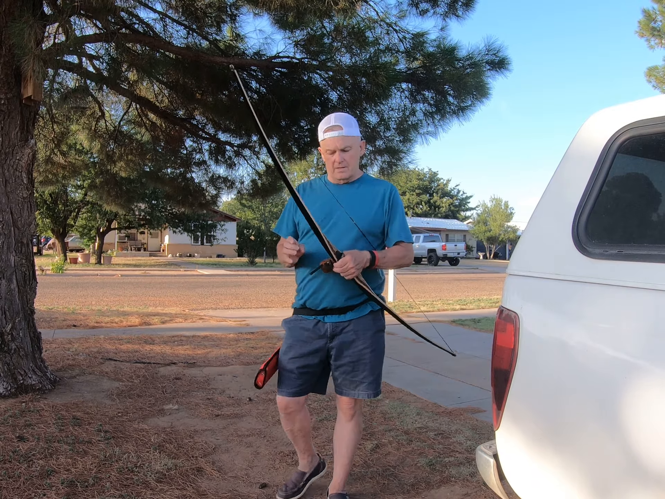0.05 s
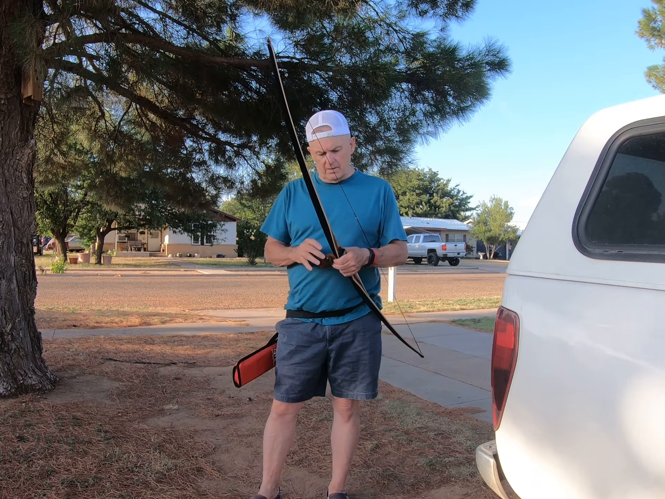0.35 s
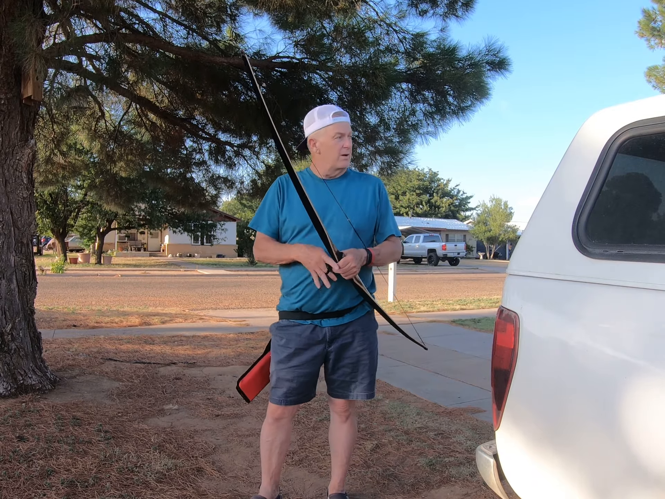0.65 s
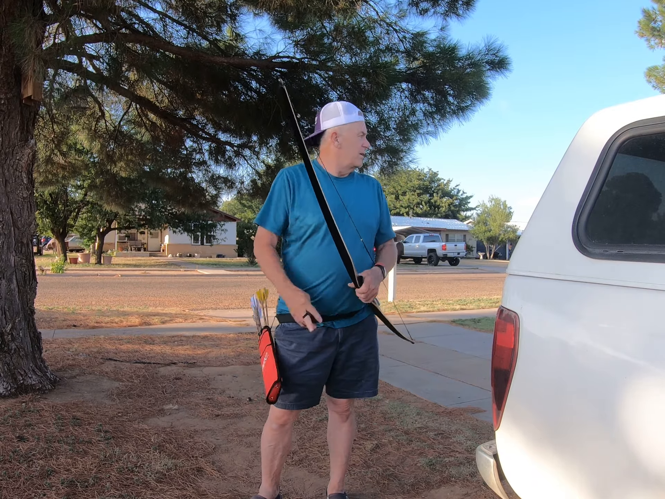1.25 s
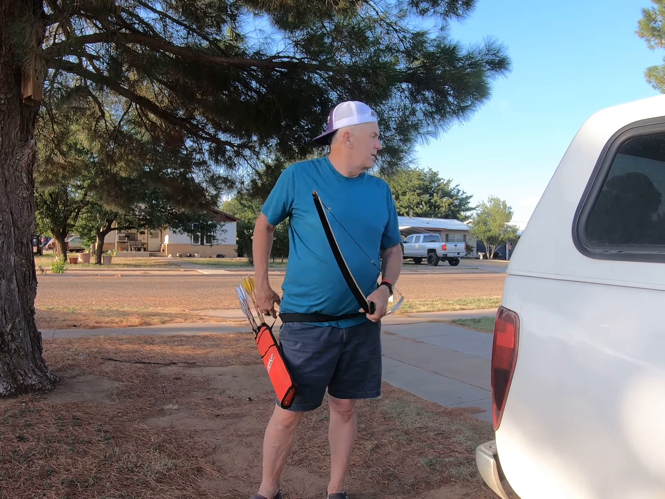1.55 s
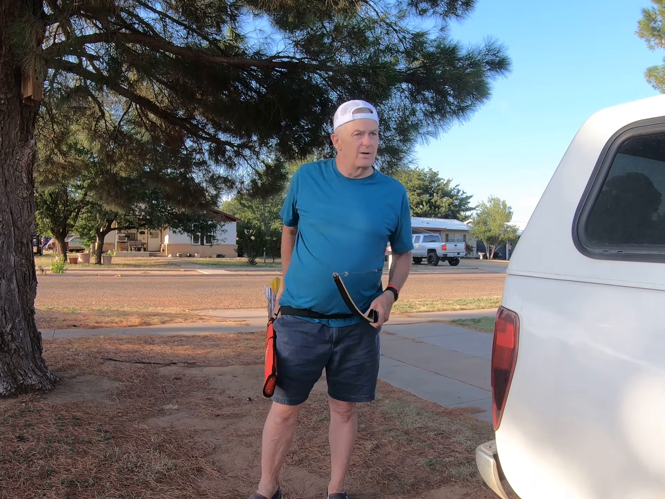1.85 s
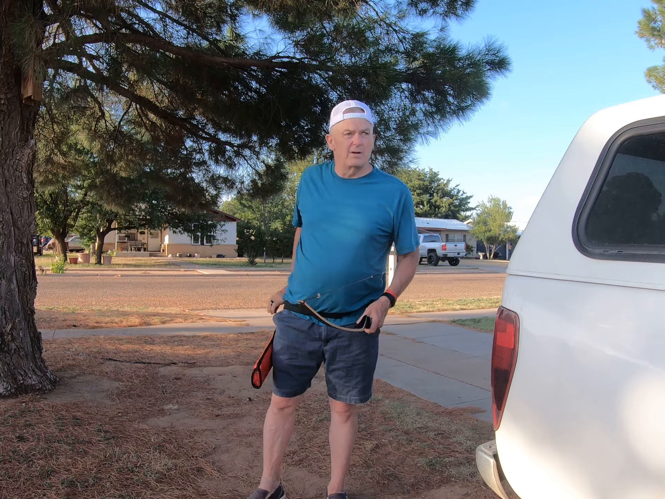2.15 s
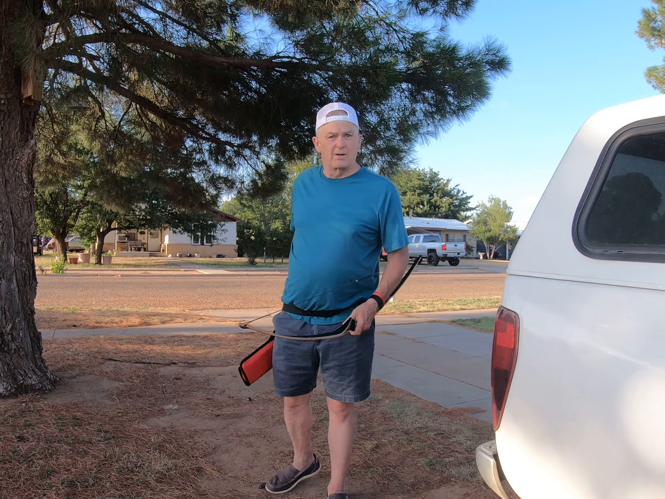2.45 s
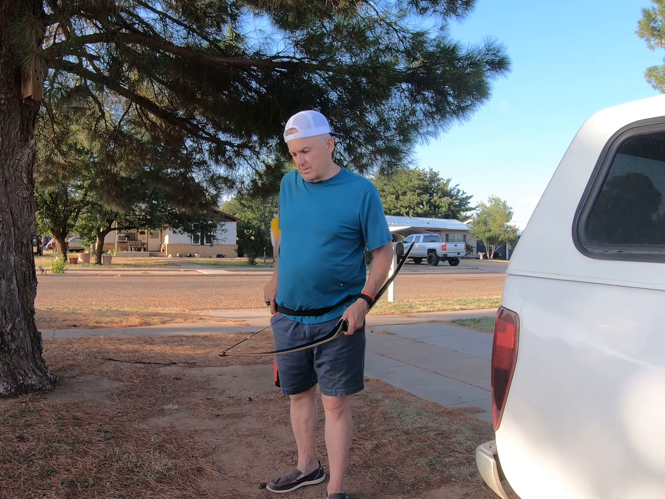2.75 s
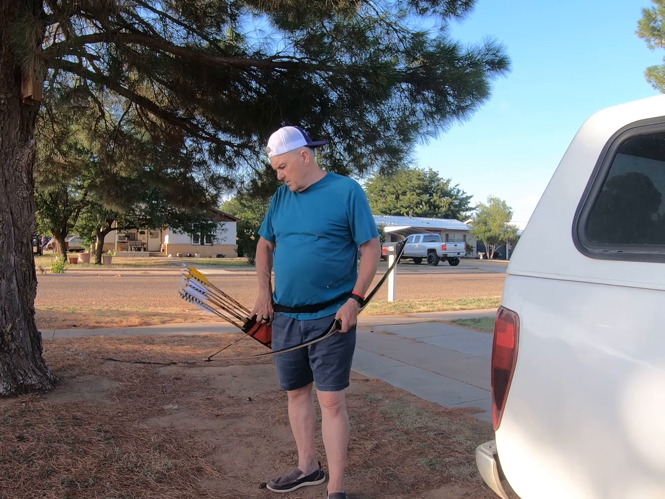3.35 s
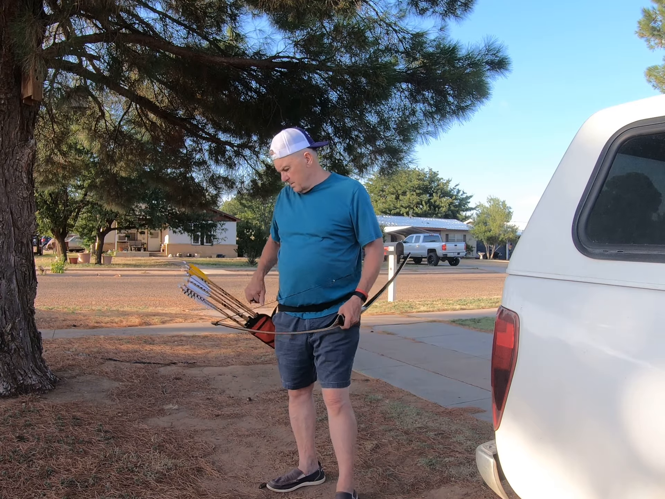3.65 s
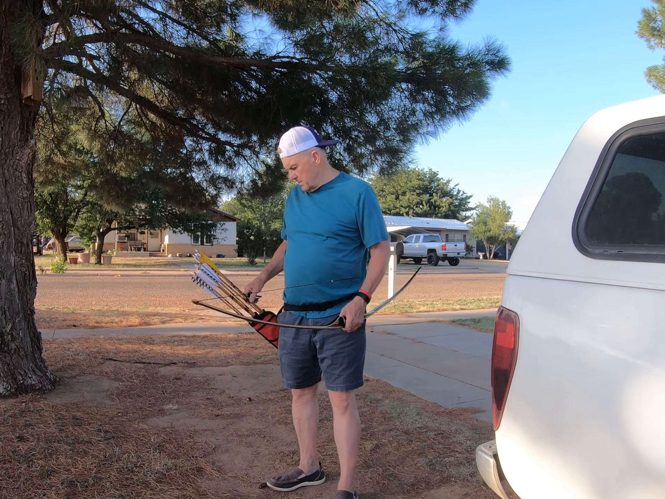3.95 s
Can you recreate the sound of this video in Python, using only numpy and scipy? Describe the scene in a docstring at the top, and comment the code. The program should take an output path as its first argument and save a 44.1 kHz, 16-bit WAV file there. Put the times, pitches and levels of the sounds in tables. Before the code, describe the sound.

Arrow shafts knock and slide inside a quiver outdoors. They go quiet for about a second, then chatter more densely with a few soft thuds against the quiver wall, while wind buffets the microphone, most strongly near the end.

```python
"""Arrows shifting in a hip quiver.

Shafts knock, chatter and slide along the quiver wall, which thuds under the heaviest shoves.
Each shaft contact rings short modes and a dry crack, with faint scatter from ground and trees.
Gusts rumble on the microphone over a distant outdoor hush."""
import sys
import numpy as np
from scipy import signal
from scipy.fft import rfft, irfft
from scipy.io import wavfile
from scipy.ndimage import uniform_filter1d

SR = 44100
rng = np.random.default_rng(int(sys.argv[2]) if len(sys.argv) > 2 else 0)


def master(y):
    """Save y as 16-bit WAV."""
    cut = np.clip(np.atleast_2d(y).T, -1, 1)
    pcm = np.round(cut * 32767)  # scale
    wavfile.write(sys.argv[1], SR, pcm.astype(np.int16))


N = 176400


def undb(db):
    """Decibels to gain."""
    return 10 ** (np.asarray(db) / 20)


def unit(x):
    """Scale to rms 1."""
    return x / np.sqrt(np.mean(x ** 2) + 1e-24)


def add(out, start_s, x):
    """Mix x into out at start_s."""
    i = max(int(start_s * SR), 0)
    out[i:i + len(x)] += x[:N - i]


def band(x, lo_hz, hi_hz, order):
    """Causal band-pass."""
    return signal.sosfilt(signal.butter(order, [lo_hz, hi_hz], "band", fs=SR, output="sos"), x)


def fade(t, t60_s):
    """Exponential decay."""
    return np.exp(-np.log(1000) * t / t60_s)


def coloured(spectrum):
    """Unit-rms noise shaped by (freq_hz, density_db) points, rolled off below the first."""
    hz, db = np.array(spectrum).T
    bins_hz = np.maximum(np.fft.rfftfreq(N, 1 / SR), 1e-3)
    gain = undb(np.interp(np.log(bins_hz), np.log(hz), db)) * np.minimum(bins_hz / hz[0], 1) ** 2
    return unit(irfft(rfft(rng.standard_normal(N)) * gain, N))


def narrow(pitch_hz, width_hz):
    """Wavering tone: noise in one resonance."""
    return unit(band(rng.standard_normal(N), pitch_hz - width_hz / 2, pitch_hz + width_hz / 2, order=2))


def drift(rate_hz):
    """Slow random drift, spread near 1."""
    hold = int(SR / rate_hz)
    steps = np.repeat(rng.standard_normal(N // hold + 1), hold)
    return 1.3 * uniform_filter1d(uniform_filter1d(steps, hold), hold)[:N]


def steady(x, window_s=0.11):
    """Hold the running rms near 1."""
    return x / np.sqrt(uniform_filter1d(x ** 2, int(window_s * SR)) + 1e-6)


def distance():
    """Outdoor hush, a low drone and a thin far whine that fades early."""
    # freq_hz, density_db
    hush_spectrum = [(41, -28), (70, 4), (98, 0), (173, -6), (207, -4.5), (227, -13), (304, -9.5),
                     (381, -14.5), (457, -15), (670, -17.5), (1290, -22), (1410, -21.5), (1550, -23.5),
                     (3490, -32), (15500, -40)]
    # pitch_hz, width_hz, level_db
    drone_tones = [(121.8, 28.6, -66), (175, 27, -64.5), (238.6, 22.8, -69), (277.2, 18.3, -72)]
    whine_end_s, whine_fade_s = 1, 0.49
    t = np.arange(N) / SR
    drone = sum(undb(db) * narrow(hz, width_hz) for hz, width_hz, db in drone_tones)
    whine = undb(-73.5) * narrow(pitch_hz=1373, width_hz=57)
    whine *= np.clip((whine_end_s - t) / whine_fade_s, 0, 1)
    hush = undb(-56.5 + 0.17 * drift(rate_hz=5)) * coloured(hush_spectrum)
    return hush + drone + whine


def wind():
    """Buffeting on the microphone follows the gusts; slow pressure swings follow them less."""
    # time_s, strength_db
    gusts = [(0.03, -36), (0.08, -34), (0.25, -45.5), (0.37, -56), (0.48, -43), (0.79, -48), (0.95, -26.5),
             (1.18, -44.5), (1.23, -67), (1.37, -48.5), (1.61, -51.5), (1.67, -53), (1.74, -57),
             (2.07, -48.5), (2.14, -35), (2.2, -56.5), (3.11, -58.5), (3.18, -40), (3.3, -41.5),
             (3.36, -26), (3.45, -17), (3.54, -39), (3.57, -39), (3.67, -25.5), (3.85, -46.5), (3.94, -24)]
    # freq_hz, density_db
    buffet_spectrum = [(21, -1), (28, 4.5), (39, -17), (55, -15), (70, -42), (110, -40), (300, -78),
                       (1000, -110)]
    # freq_hz, density_db
    sway_spectrum = [(3, 3.5), (9, 6), (16, -7.5), (22, -29), (30, -23.5), (60, -46), (300, -110)]
    gust_db = np.interp(np.arange(N) / SR, *np.array(gusts).T)
    gust_db = uniform_filter1d(gust_db, SR // 40)
    buffet = steady(coloured(buffet_spectrum)) * undb(gust_db + 5)
    sway = steady(coloured(sway_spectrum)) * undb(0.42 * gust_db - 7)
    return buffet + sway


def outdoor_scatter(x, level_db=-19, delay_s=0.008):
    """Add faint reflections from ground and trees."""
    t = np.arange(SR // 2) / SR
    tail = band(rng.standard_normal(len(t)), 300, 9000, order=1) * fade(t, t60_s=0.33) * (t > delay_s)
    return x + undb(level_db) * signal.fftconvolve(x, tail / np.linalg.norm(tail))[:N]


def wall_thuds(attack_s=0.0022):
    """The soft quiver wall thuds under the heaviest shoves."""
    # start_s, level_db, t60_s
    shoves = [(.292, -50, 0.17), (2.307, -67, 0.045), (2.868, -50, 0.077), (3.506, -54, 0.034)]
    out, t = np.zeros(N), np.arange(SR // 4) / SR
    for start_s, level_db, t60_s in shoves:
        wall = unit(band(rng.standard_normal(len(t)), 220, 470, order=2))
        add(out, start_s, undb(level_db) * wall * np.minimum(t / attack_s, 1) * fade(t, t60_s))
    return out


def contacts(size, rate_per_s, scatter_db=3.5):
    """Random tiny impacts of uneven force."""
    hits = rng.random(size) < rate_per_s / SR
    return hits * undb(scatter_db * rng.standard_normal(size)) * rng.choice([-1, 1], size)


def shafts(force, clack_hz, crack_db):
    """Contact forces excite shaft modes and a dry crack. Returns body, clack and tip tick bands."""
    # pitch_hz, relative_db
    modes = [(600, 0.5), (920, -2.5), (1270, -2.5), (1680, -2.5), (2080, -6), (2620, 2.5), (3130, 4),
             (3600, -0.5), (4210, 1.5), (4740, 4.5), (5240, 1.5), (5890, -5.5), (7350, 1), (10100, -11)]
    scatter_ratio, scatter_db, clack_width_ratio = 0.028, 4, 1.27
    body_lo_hz, clack_lo_hz, tick_lo_hz, tick_hi_hz = 700, 1877, 6110, 11700
    size, t = len(force), np.arange(SR // 8) / SR
    ring = 0
    for pitch_hz, relative_db in modes:
        detune, strength, polarity = rng.standard_normal(3)
        gain = np.sign(polarity) * undb(relative_db + scatter_db * strength)
        ring += gain * np.sin(2 * np.pi * pitch_hz * (1 + scatter_ratio * detune) * t)
    ringing = signal.fftconvolve(force, ring * fade(t, t60_s=0.027))[:size]
    crack_power = signal.fftconvolve(force ** 2, fade(t, t60_s=0.0051) ** 2)[:size]
    crack = rng.standard_normal(size) * np.sqrt(np.abs(crack_power))
    struck = unit(ringing) + undb(crack_db) * unit(crack)
    # The point of contact colours the clack.
    tinted = band(struck, clack_hz / clack_width_ratio, clack_hz * clack_width_ratio, order=1)
    body = band(struck, body_lo_hz, clack_lo_hz, order=2)
    clack = band(tinted, clack_lo_hz, tick_lo_hz, order=5)
    tick = band(struck, tick_lo_hz, tick_hi_hz, order=3)
    return body, clack, tick


def shaft_slides(gain_db=-3):
    """Shafts stick and slip along the quiver wall, swelling and dying away."""
    # peak_s, rise_s, fall_s, body_db, clack_db, tick_db, clack_hz
    slides = [(.03, 0.027, 0.14, -64, -70, -79, 4500), (.272, 0.0051, 0.045, -54, -55, -62.5, 3200),
              (.292, .024, 0.045, -50, -47.5, -59, 2200), (0.324, .02, .02, -50, -82, -86, 3000),
              (2.34, 0.059, 0.1, -61, -61.5, -71, 3700), (2.41, 0.042, .07, -65, -62.5, -72, 3600),
              (2.675, .11, 0.098, -62, -61, -73, 3630), (2.667, 0.014, 0.028, -59.5, -56.5, -60, 3280),
              (2.892, 0.01, 0.054, -56, -50, -60, 4000), (2.93, 0.027, 0.024, -56, -49, -62, 4350),
              (3.04, 0.11, .1, -71, -63.5, -72, 4760), (3.118, 0.044, 0.044, -69, -56, -66, 4900),
              (3.40, .08, 0.069, -68, -68, -73, 4400), (3.489, 0.02, .018, -57, -53.5, -61, 2800),
              (3.68, .1, 0.14, -65, -67.5, -80, 4180)]
    out, t = np.zeros(N), np.arange(SR // 2) / SR
    for peak_s, rise_s, fall_s, *bands_db, clack_hz in slides:
        pressure = np.interp(t, [0, rise_s, rise_s + fall_s], [0, 1, 0])
        pressure_rms = np.sqrt(np.mean(pressure ** 2))
        force = contacts(len(t), rate_per_s=2600) * pressure
        for part, db in zip(shafts(force, clack_hz, crack_db=7.5), bands_db):
            add(out, peak_s - rise_s, unit(part) * pressure_rms * undb(db + gain_db))
    return out


def shaft_knocks(gain_db=-2.5):
    """A shaft strikes its neighbours, which chatter briefly."""
    # start_s, body_db, clack_db, tick_db, chatter_t60_s, clack_hz
    knocks = [(.0942, -67, -61, -78, .012, 3940), (0.138, -55, -55.5, -75, 0.028, 3740),
              (.7645, -59, -67, -73, 0.052, 3500), (.904, -60, -68, -79, 0.039, 3440),
              (2.028, -87, -65.5, -85, .03, 3900), (2.053, -57, -61, -79, 0.014, 3370),
              (2.217, -68, -63, -80, 0.025, 3720), (2.3066, -53, -77, -78, 0.05, 2800),
              (2.387, -56, -59, -84, 0.027, 3800), (2.48, -63, -66, -86, 0.093, 3580),
              (2.525, -64, -64, -74, 0.08, 3800), (2.607, -64, -64, -82, .04, 4700),
              (2.621, -59, -64, -78, 0.026, 4000), (2.648, -46, -43.5, -53.5, 0.045, 3460),
              (2.8611, -61, -53, -66, 0.026, 3500), (2.8668, -48, -51.5, -52, 0.013, 3870),
              (2.8755, -44.5, -40.5, -46.5, 0.056, 3830), (2.885, -70, -49, -58, 0.045, 4200),
              (2.922, -57, -56, -57.5, 0.037, 4520), (2.9705, -63, -56, -73, .05, 4200),
              (2.9968, -63, -61, -67, .015, 5200), (3.0341, -58, -45.5, -60.5, 0.047, 4630),
              (3.133, -70, -73, -61, .012, 5200), (3.1455, -70, -60.5, -59, 0.053, 5270),
              (3.175, -67, -67, -75, .015, 5300), (3.204, -75, -71, -74, .015, 5200),
              (3.308, -67, -66, -74, 0.031, 5230), (3.376, -77, -62.5, -69, 0.018, 4400),
              (3.427, -60, -65, -74, 0.019, 4400), (3.493, -80, -60, -61, 0.006, 3750),
              (3.505, -51.5, -51.5, -61, 0.062, 2580), (3.5329, -78, -54.5, -58, .03, 4370),
              (3.6284, -77, -68, -73, .02, 5200)]
    chatter_db, hold_s, attack_s = 7, 0.001, 0.008
    out, t = np.zeros(N), np.arange(SR // 4) / SR
    for start_s, *bands_db, chatter_t60_s, clack_hz in knocks:
        chatter = contacts(len(t), rate_per_s=1400) * fade(np.maximum(t - hold_s, 0), chatter_t60_s)
        force = undb(chatter_db) * chatter / (np.linalg.norm(chatter) + 1e-9)
        force[0] += 1  # first strike
        for part, db in zip(shafts(force, clack_hz, crack_db=4.5), bands_db):
            attack_rms = part[:int(attack_s * SR)].std()
            add(out, start_s, part / attack_rms * undb(db + gain_db))
    return out


def scene():
    """Quiver, wind and distance in mono."""
    quiver = shaft_knocks() + shaft_slides() + wall_thuds()
    return (outdoor_scatter(quiver) + wind() + distance())[None]


def record(dry):
    """Steep low-pass on the top treble."""
    cutoff_hz = 15780
    return signal.sosfilt(signal.ellip(10, 0.1, 80, cutoff_hz, fs=SR, output="sos"), dry)


dry = scene()
out = record(dry)
master(out)
```